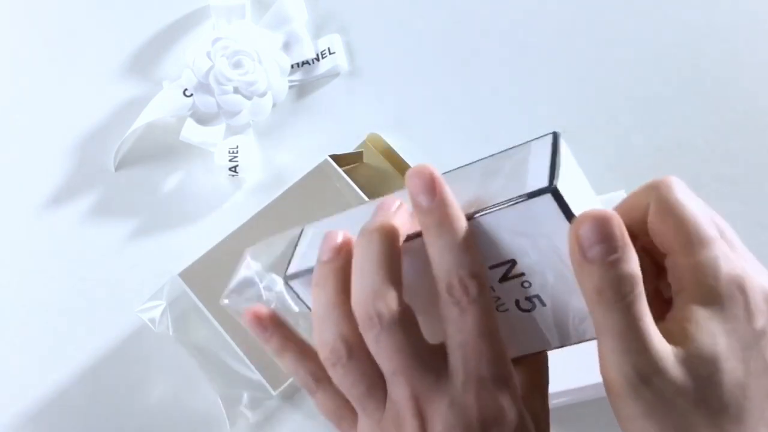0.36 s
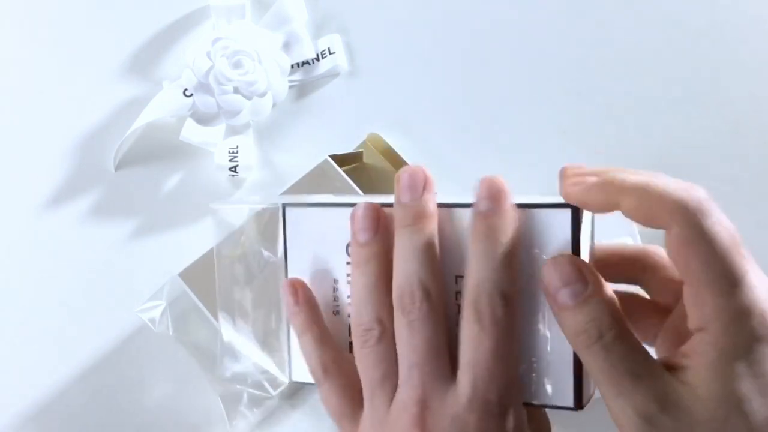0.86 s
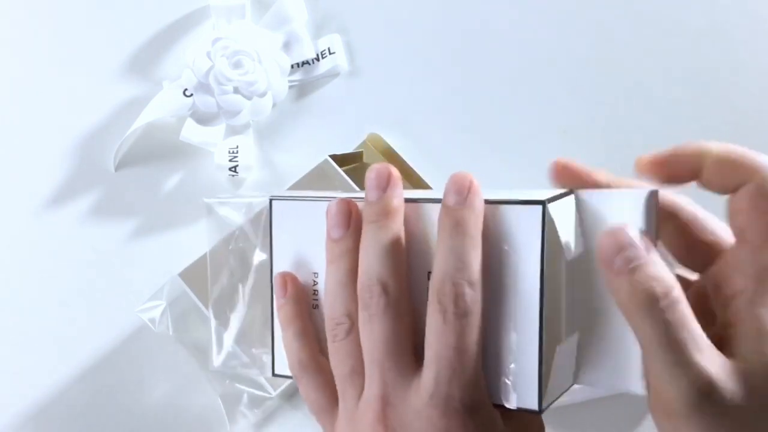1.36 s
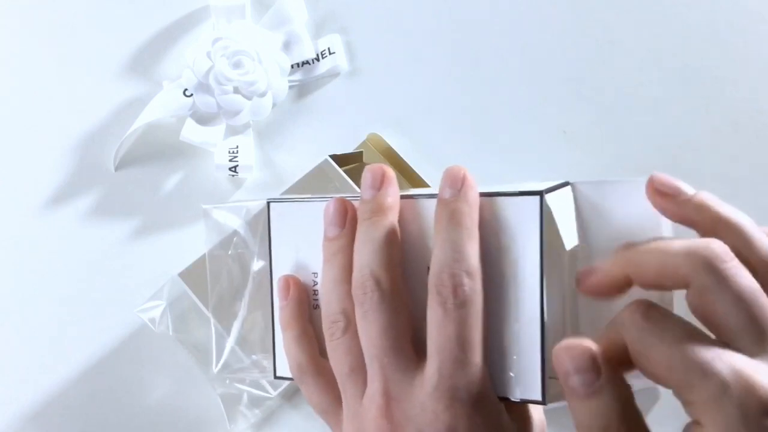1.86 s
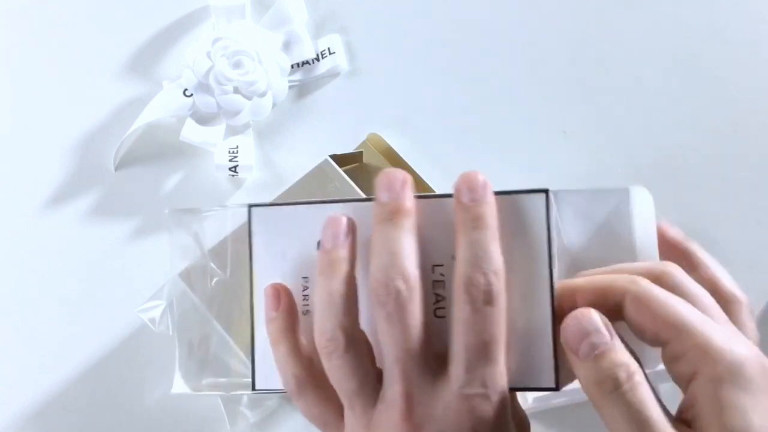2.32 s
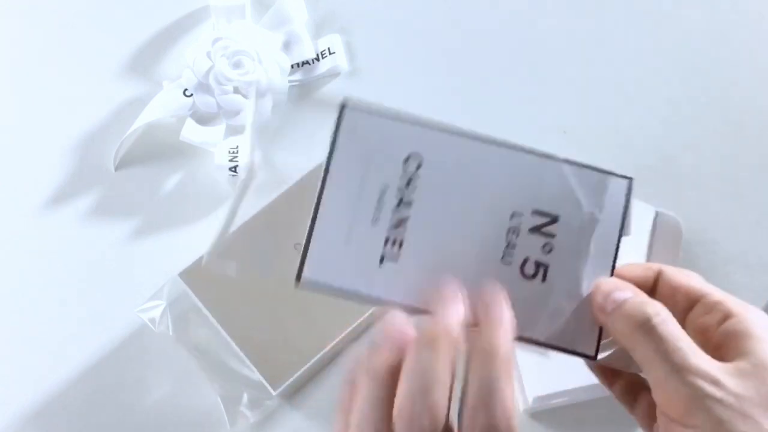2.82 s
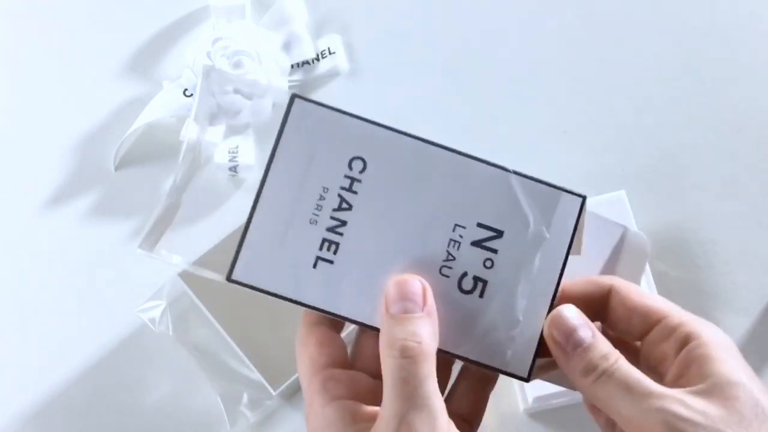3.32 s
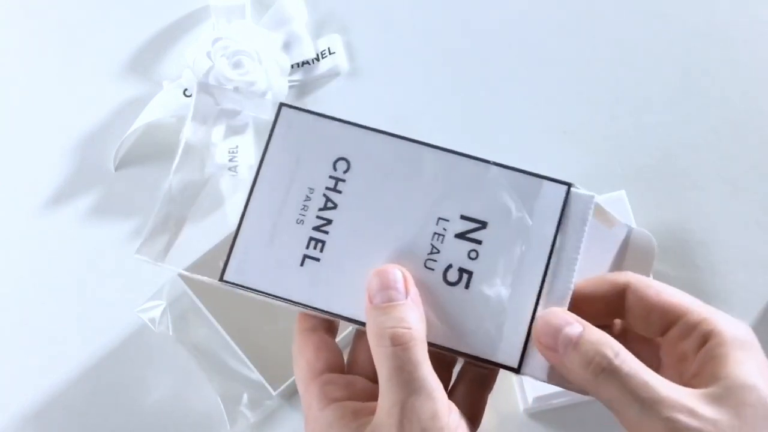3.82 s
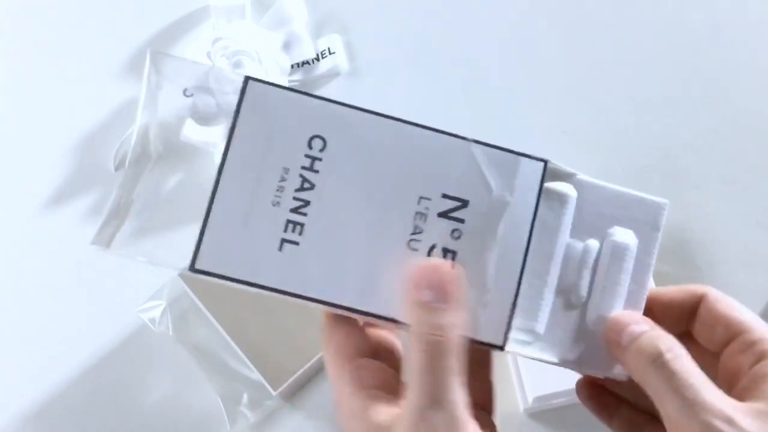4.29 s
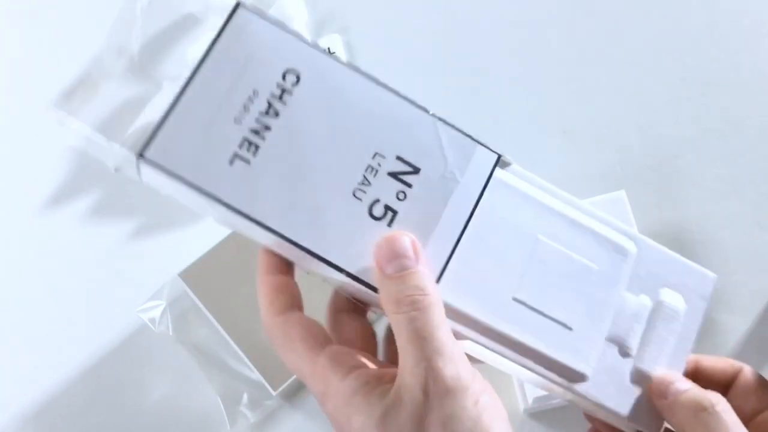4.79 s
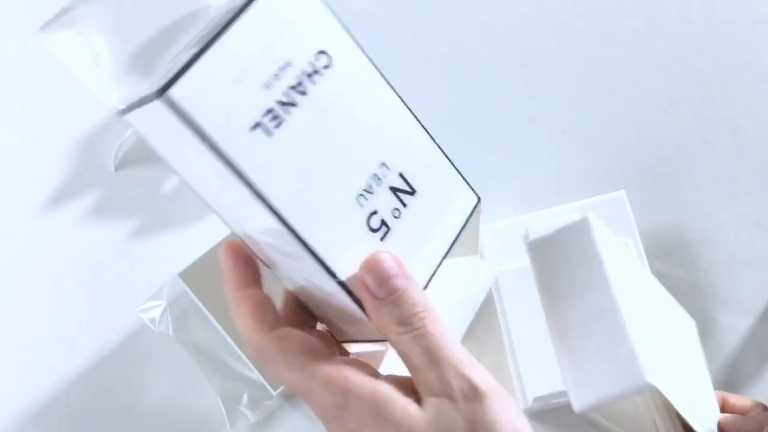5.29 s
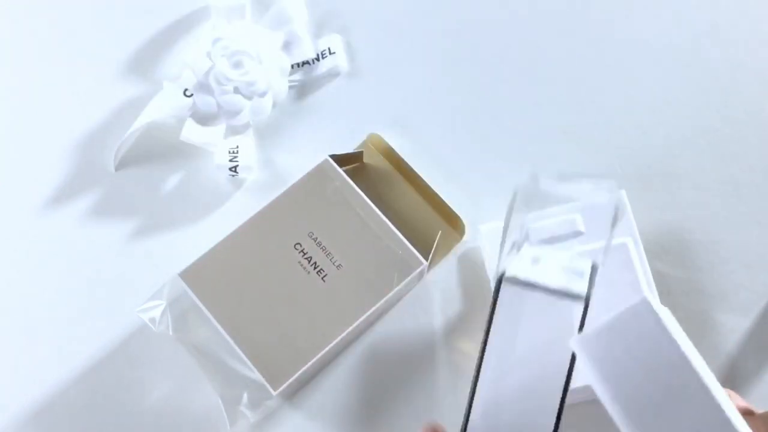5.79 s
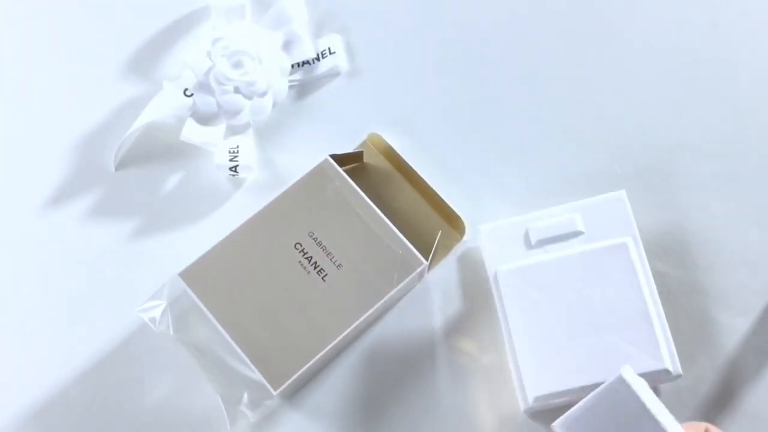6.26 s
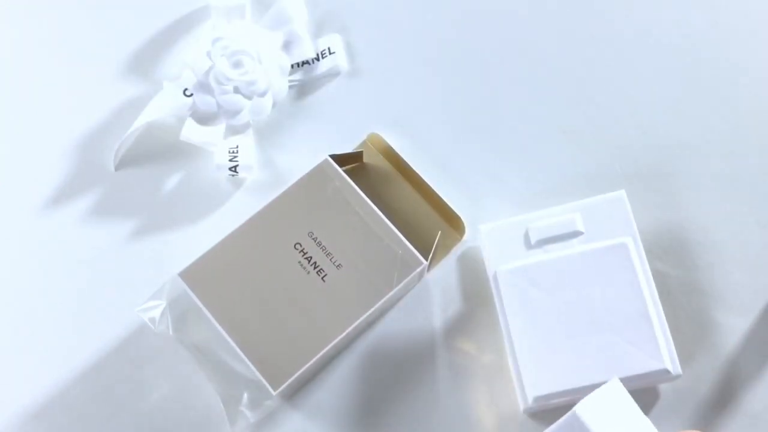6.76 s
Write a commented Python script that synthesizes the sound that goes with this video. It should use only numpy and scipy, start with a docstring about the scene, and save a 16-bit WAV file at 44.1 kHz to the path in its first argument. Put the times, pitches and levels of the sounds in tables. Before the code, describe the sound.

Dry plastic crackles, card rubs and hollow taps in a quiet room, a scraping tray that cracks loose, then a last crinkly flurry and stillness.

```python
"""At a table in a small quiet room, close to the microphone, hands open a small cardboard box in plastic film.
Skin hisses, rasps and drones over the card, made of uneven noise shaped by resonances. Film crackles and
knocks are short bursts that ring the card, the air in the box and the table. A moulded tray drags, snaps
free with decaying tones and slides out in a second pull; near the end come faint squeaks and scuffs.
"""
import sys
import numpy as np
from scipy import signal
from scipy.fft import rfft, irfft, next_fast_len
from scipy.io import wavfile
from scipy.ndimage import uniform_filter1d, map_coordinates

SR = 44100
rng = np.random.default_rng(int(sys.argv[2]) if len(sys.argv) > 2 else 0)


def unload_wav(signal):
    """Save mono or channel-first audio to the path in sys.argv[1] as 16-bit WAV at rate SR, clipped to [-1, 1]."""
    wavfile.write(
        sys.argv[1],
        SR,
        np.round(np.clip(np.atleast_2d(signal).T, -1, 1) * 32767).astype(np.int16),
    )


def volts_from_decibels(level):
    """Turn decibel levels (scalar or array-like) into linear amplitude factors."""
    exponent = np.asarray(level, float) / 20
    return 10 ** exponent


N = 314323  # length in samples


def unit(x):
    """Scale to rms 1."""
    return x / np.sqrt(np.mean(x ** 2) + 1e-20)


def colour(points):
    """Loudness against pitch, drawn through (pitch_hz, level_db) points on a log pitch axis."""
    pitch_hz, level_db = np.transpose(points)
    return lambda hz: volts_from_decibels(np.interp(np.log(hz + 1), np.log(pitch_hz + 1), level_db))


def resonances(modes, scale=1):
    """How a body rings at (pitch, width_hz, level_db) modes; scale multiplies the pitches only."""
    def response(hz):
        total = 0
        for k, (pitch, width_hz, level_db) in enumerate(modes):
            damping = 1j * hz * width_hz
            # neighbours alternate in sign
            total = total + (-1) ** k * volts_from_decibels(level_db) * damping / ((pitch * scale) ** 2 - hz * hz + damping)
        return total
    return response


def filtered(x, response):
    """Shape a sound by a response that depends on frequency."""
    size = next_fast_len(len(x) + 4096)  # spare room for the ringing
    return irfft(rfft(x, size) * response(np.fft.rfftfreq(size, 1 / SR)), size)[:len(x)]


def curves(rows):
    """One value per sample for each column after the time."""
    time_s, *columns = np.transpose(rows)
    return [np.interp(np.arange(N) / SR, time_s, column) for column in columns]


def wobble(rate):
    """A smooth random curve with rate knots a second."""
    knots = rng.standard_normal(int(N * rate / SR) + 4)
    return map_coordinates(knots, [np.arange(N) * rate / SR])


def blow(contact_s, room_db, room_t60, rough=1):
    """A short contact, rough or clean, then the room's diffuse answer building up and dying."""
    t = np.arange(SR // 5) / SR
    room = volts_from_decibels(room_db - 60 * t / room_t60) * (1 - np.exp(-t / 0.0016))
    noise = rng.standard_normal(len(t))
    contact = (rough * noise + 1 - rough) * np.exp(-t / contact_s)
    return contact + noise * room


def peak(x):
    """Scale to peak 1 and let the end fade to nothing."""
    return x / np.abs(x).max() * np.cos(np.linspace(0, np.pi / 2, len(x)))


def add(track, start_s, sound):
    """Mix a sound in at a time."""
    part = track[round(start_s * SR):][:len(sound)]
    part += sound[:len(part)]


def stroke(start_s, end_s, level_db):
    """One smooth swell and fade."""
    progress = np.clip((np.arange(N) / SR - start_s) / (end_s - start_s), 0, 1)
    return volts_from_decibels(level_db) * np.sin(np.pi * progress)


def scrape(response, grain_db, flutter_db, patchy_db=2.0, catch=0):
    """Friction: dense slips of uneven size in uneven clumps; the contact shifts, so colour comes in patches."""
    sizes = np.minimum(rng.exponential(size=N), 5)  # no slip is huge
    slips = unit(rng.standard_normal(N) * volts_from_decibels(grain_db * sizes))
    catches = rng.random(N) < 130 / SR  # about 130 a second: the card sticks and lets go
    slips = slips + catch * rng.uniform(-1.1, 1, N) * catches
    clumps = volts_from_decibels(flutter_db * (wobble(25) + wobble(90)))
    spectrum = signal.stft(slips * clumps, nperseg=256)[2]
    patches = uniform_filter1d(rng.standard_normal(spectrum.shape), size=3, axis=0)  # over pitch
    patches = uniform_filter1d(patches, size=12, axis=1)  # over time
    patchy = signal.istft(spectrum * volts_from_decibels(patchy_db * unit(patches)), nperseg=256)[1][:N]
    return unit(filtered(patchy, response))


# colour of the room tone, relative levels: pitch_hz [Hz], level_db [dB]
ROOM_COLOUR = [(15, -65), (25, -31), (190, -9), (335, -13.5), (427, -15.5), (591, -20), (5140, -31),
               (14800, -32.5), (16000, -48)]


def room_tone():
    """Low murmur of the house and the hiss of the microphone, as steady coloured noise."""
    return volts_from_decibels(-72) * unit(filtered(rng.standard_normal(N), colour(ROOM_COLOUR)))


# strokes of skin on card and film: start_s (full pressure) [s], hold_s [s], hiss_db [dB], drone_db [dB]
STROKES = [(0, 0, -55.5, -52.5), (0.068, 0.01, -59, -55.5), (0.15, 0.16, -68.5, -70),
           (0.395, 0.045, -85, -56), (0.421, 0.038, -63.5, -63), (0.585, 0, -81, -60),
           (0.803, 0.034, -69, -66.5), (0.98, 0.0051, -74, -63), (1.25, 0.019, -73, -50),
           (1.261, 0.024, -46, -68), (1.312, 0.0064, -56, -48.5), (1.395, 0.16, -79, -65),
           (1.706, 0, -57.5, -60), (1.747, 0.1, -75, -63.5), (1.919, 0.048, -69.5, -55.5),
           (2.122, 0, -68, -57.5), (2.213, 0.05, -89, -66.5), (2.391, 0.11, -71.5, -61),
           (2.564, 0.083, -73.5, -66), (2.751, 0.06, -72, -64.5), (3.396, 0.062, -66.5, -62),
           (3.476, 0.011, -83, -53.5), (3.544, 0, -68.5, -51.5), (3.773, 0.072, -70, -55.5),
           (3.803, 0.032, -60, -54.5), (4.384, 0.00073, -60, -47), (4.447, 0.063, -76, -63),
           (5.229, 0.016, -61.5, -51), (5.245, 0.033, -60.5, -48), (5.347, 0.042, -74, -62.5),
           (5.859, 0.04, -72.5, -61), (6.015, 0.12, -80, -71), (6.19, 0.031, -78, -58.5),
           (6.253, 0.016, -49.5, -58), (6.363, 0, -55.5, -53), (6.43, 0.044, -75, -73)]
# the tray drags out in two pulls, one list each: time_s [s], drag_db [dB], singing_db of the ribs [dB]
PULLS = [
    [(3.88, -66.5, -85), (3.96, -67, -84), (3.99, -52, -76), (4.04, -53, -65), (4.11, -51, -54.5),
     (4.19, -51, -58.5), (4.28, -59.5, -72), (4.4, -64, -82)],
    [(4.56, -86.5, -97), (4.6, -51.5, -63), (4.69, -45, -50), (4.715, -50.5, -64), (4.8, -43.5, -62),
     (4.87, -49, -63), (4.99, -47.5, -56.5), (5.05, -46, -50), (5.1, -53, -68), (5.2, -68.5, -82)],
]
# hiss of each pull at full drag: level_db [dB]
PULL_HISS_DB = [-53, -56.5]


def pressure():
    """Hiss and drone levels in dB: resting hands, all strokes and both pulls add their power."""
    press_db_per_s, lift_db_per_s = 713, 361  # a stroke sets in and lets go
    approach_db, approach_db_per_s = -15, 260  # before it the hand creeps into place
    settle_db, settle_db_per_s = -13.5, 104  # after it the card settles slowly
    resting_hiss_db, resting_drone_db = -89.5, -84  # hands that only hold the box
    full_drag_db, hiss_follows = -46, 0.42  # near full drag the hiss follows it only in part

    t = np.arange(0, N / SR, .002)
    start_s, hold_s, *levels_db = np.transpose(STROKES)[:, :, None]
    before_s = np.maximum(start_s - t, 0)
    after_s = np.maximum(t - start_s - hold_s, 0)
    rise_db = np.maximum(-press_db_per_s * before_s, approach_db - approach_db_per_s * before_s)
    fall_db = np.maximum(-lift_db_per_s * after_s, settle_db - settle_db_per_s * after_s)
    power = volts_from_decibels([[resting_hiss_db], [resting_drone_db]]) ** 2
    power = power + np.sum(volts_from_decibels(levels_db + (rise_db + fall_db)) ** 2, axis=1)
    for pull, full_hiss_db in zip(PULLS, PULL_HISS_DB):
        time_s, drag_db, _ = np.transpose(pull)
        drag_db = np.interp(t, time_s, drag_db, left=-np.inf, right=-np.inf)
        slack_db = drag_db - full_drag_db
        hiss_db = full_hiss_db + np.minimum(hiss_follows * slack_db, slack_db + 0.5)
        power = power + volts_from_decibels([hiss_db, drag_db]) ** 2
    return curves(np.transpose([t, *10 * np.log10(power)]))


# colour of the surface hiss, relative levels: pitch_hz [Hz], level_db [dB]
HISS_COLOUR = [(2700, -21.5), (3700, -12.5), (6000, -8.5), (13100, -20.5), (15500, -23.5), (16000, -44)]


def surface_hiss(hiss_db):
    """Skin hisses over the surface: friction noise that follows the strokes."""
    return volts_from_decibels(hiss_db) * scrape(colour(HISS_COLOUR), grain_db=3.0, flutter_db=1.85)


# how the stiff card rings, also when it snaps: pitch_hz [Hz], width_hz [Hz], level_db [dB]
CARD = [(1570, 410, -0.5), (2052, 150, 6), (2380, 700, -2), (3470, 830, -0.5), (4930, 2000, -10)]


def card_rasp(hiss_db, drone_db):
    """The card rasps at its own resonances, at a level between hiss and drone."""
    rasp_db = 0.53 * hiss_db + 0.48 * drone_db - 0.7
    return volts_from_decibels(rasp_db) * scrape(resonances(CARD), grain_db=3.0, flutter_db=2.7)


# the air in the box rings higher when tilted or emptied: time_s [s], pitch_hz [Hz]
CAVITY = [(.3, 1130), (.4, 863), (1.26, 938), (1.3, 1014), (1.36, 882), (2.1, 862), (2.84, 843),
          (3.0, 1010), (3.3, 910), (4.1, 912), (4.62, 1100), (4.73, 1180), (4.8, 947), (4.92, 1110),
          (5.1, 1000), (5.4, 890), (5.8, 1063), (6.23, 966), (6.275, 763), (6.37, 1000), (7.13, 1130)]
# how the hollow box rings, also when knocked: pitch [times the cavity pitch], width_hz [Hz], level_db [dB]
BOX = [(1.001, 102.7, 6), (1.25, 160.2, 0), (1.42, 250, -2.5)]
# the drone cross-fades between these: pitch_hz [Hz]
BOX_PITCHES_HZ = [899, 972, 1190]


def box_drone(drone_db):
    """Rubbing, with sudden catches, rings the air in the box; its pitch follows the cavity."""
    cavity_hz, = curves(CAVITY)
    drone = np.zeros(N)
    for pitch_hz, picked in zip(BOX_PITCHES_HZ, np.eye(len(BOX_PITCHES_HZ))):
        share = np.interp(cavity_hz, BOX_PITCHES_HZ, picked)
        inside = resonances(BOX, pitch_hz)
        mouth = resonances([(1.1, 800, 0)], pitch_hz)
        rubbed = scrape(lambda hz: inside(hz) * mouth(hz), grain_db=4.0, flutter_db=1.5, catch=volts_from_decibels(20.5))
        drone += np.sqrt(share) * rubbed
    return volts_from_decibels(drone_db) * drone


# how hard the hands work the box: time_s [s], level_db of the rumble [dB]
HANDLING = [(0, -61), (.6, -78.5), (1.2, -84), (1.35, -69.5), (2, -89), (2.5, -67), (3.1, -91), (3.35, -77),
            (3.42, -61.5), (3.75, -78.5), (4.15, -60), (4.5, -65.5), (5.3, -64), (5.5, -73), (6.15, -76),
            (6.2, -64), (6.45, -69), (6.6, -71.5), (7.13, -75.5)]
# how box panels and table top ring, also when knocked: pitch_hz [Hz], width_hz [Hz], level_db [dB]
PANELS = [(142, 79, -18), (175.2, 14, -3.5), (285, 76, -4), (402, 34, 4), (497, 65, -1), (715, 130, -2.5)]


def handling_rumble():
    """Handling makes the panels and the table top rumble."""
    rumble_db, = curves(HANDLING)
    return volts_from_decibels(rumble_db) * scrape(resonances(PANELS), grain_db=1.5, flutter_db=2.5)


# film and paper crackles: start_s [s], level_db (peak of the film click) [dB],
# card_db (rough rms of the card snap against that peak) [dB]
CRACKLES = [(0.0044, -30, -43), (0.0536, -31.5, -48), (0.1235, -37, -14), (0.1745, -43, -13),
            (0.186, -40, -27), (0.205, -45, -6), (0.2398, -40, -18), (0.2688, -52, -22),
            (0.3935, -31.5, -15), (0.402, -32.5, -17), (0.432, -36, -14.5), (0.4387, -34.5, -44),
            (0.7889, -33.5, -13), (0.881, -60.5, -2), (0.9563, -43, -3.5), (1.1177, -55, -8.5),
            (1.2066, -44, -16), (1.2554, -36, -15), (1.243, -48, 3), (1.262, -36, -17), (1.272, -31.5, -17),
            (1.288, -27.5, -9.5), (1.3066, -40, 1), (1.3654, -32, -7), (1.4982, -41.5, -17),
            (1.511, -40, -8.5), (1.7073, -44.5, -5), (1.9068, -48, -16), (1.957, -50, 0), (2.1185, -47, -3),
            (2.439, -44.5, 6.5), (2.545, -61.5, 1), (2.623, -41, -10), (2.7284, -51.5, -16),
            (2.831, -54.5, -6), (3.04, -52.5, 0), (3.546, -56, -6), (3.6536, -50.5, 1.5),
            (4.1277, -40.5, 3), (4.3436, -42, -24), (4.4221, -38, -16), (4.481, -45.5, -8),
            (5.119, -40.5, -3.5), (5.2973, -46, 0.5), (5.836, -56.5, 7.5), (6.1481, -29.5, -14),
            (6.1804, -40.5, -14), (6.188, -47.5, 2.5), (6.21, -38.5, -3.5), (6.2278, -37, -4),
            (6.2458, -30.5, -8.5), (6.277, -27.5, -10), (6.352, -43, -4), (6.367, -46, 1.5),
            (6.488, -58, 0.5), (6.6277, -52, -5), (6.6603, -41.5, -16.5), (6.7458, -53.5, -14),
            (6.769, -48, -11.5), (6.847, -61.5, 2)]
# colour of the film click: pitch_hz [Hz], level_db [dB]
FILM_COLOUR = [(1900, -35), (4000, -6), (6520, -6), (8330, -5.5), (14500, -6), (15300, -12.5), (16000, -35)]


def crackles():
    """The film clicks and the card under it snaps along; the more card, the duller the film."""
    out = np.zeros(N)
    for start_s, level_db, card_db in CRACKLES:
        # each crease has its own colour
        crease = resonances([(6400 * np.exp(rng.normal(0, 0.18)), 700, 5)])
        dull = 0.048 * (card_db + 14.0)

        def tone(hz):
            tilt = (6000 / np.maximum(hz, 3000)) ** dull
            return colour(FILM_COLOUR)(hz) * tilt * (1 + crease(hz))

        film = peak(filtered(blow(0.00082, -13.5, 0.11), tone))
        # a snap rings more narrowly than a rub
        modes = [(hz, .6 * width_hz, mode_db + rng.normal(0, 3)) for hz, width_hz, mode_db in CARD]
        stiff_card = resonances(modes, np.exp(rng.normal(0, 0.066)))
        card = peak(filtered(blow(0.0011, -11.5, 0.091), stiff_card))
        add(out, start_s, volts_from_decibels(level_db) * (film + volts_from_decibels(card_db + 5.5) * card))  # 5.5 dB from rms to peak
    return out


# knocks of fingers and tray on the box: start_s [s], level_db (peak of the box sound) [dB],
# thud_db (rough rms of the table thud against that peak) [dB]
KNOCKS = [(0.058, -38.5, -20.5), (0.077, -41, -25), (0.122, -42, -26), (0.206, -41, -24.5),
          (0.223, -36, -35), (0.175, -46, -30), (0.181, -43, -37), (0.241, -47, -23), (0.269, -47, -20),
          (0.392, -44, -19), (0.403, -40.5, -14.5), (0.787, -40.5, -12.5), (0.807, -42.5, -13.5),
          (0.881, -50.5, -20), (0.956, -44, -22.5), (1.117, -50.5, -13), (1.3067, -29.5, -20.5),
          (1.3099, -28, -32), (1.317, -41, -42), (1.365, -25, -24), (1.51, -49, -11), (1.699, -39.5, -29),
          (1.709, -35, -23), (1.814, -50, -18), (1.956, -47.5, -20), (2.079, -49.5, -29), (2.119, -44, -23),
          (2.442, -40.5, -3.5), (2.4466, -34, -35), (2.578, -55, -20.5), (2.702, -53.5, -27),
          (2.73, -46.5, -20), (2.832, -42, -27), (2.998, -50, -20), (3.02, -53.5, -11), (3.403, -59, 2),
          (3.419, -61, 3), (3.463, -36.5, -25), (3.471, -41.5, -22), (3.496, -39, -36), (3.528, -47, -14.5),
          (3.605, -44, -38), (3.653, -34.5, -17), (4.127, -31, -23.5), (4.182, -55, 3.5),
          (4.385, -41.5, -15.5), (4.581, -44, -26), (4.607, -39, -22), (4.631, -31.5, -23.5),
          (4.796, -39, -33), (4.813, -35.5, -25), (5.1235, -29, -31), (5.374, -39.5, -26.5),
          (5.836, -42, -20.5), (5.841, -36.5, -27), (6.191, -54.5, 3), (6.226, -39, -27),
          (6.274, -37, -22.5), (6.371, -40, -13), (6.454, -58, -20), (7, -48.5, -13.5)]


def knocks():
    """Each knock rings the air in the box and thuds through the panels into the table."""
    out = np.zeros(N)
    for start_s, level_db, thud_db in KNOCKS:
        cavity_hz = np.interp(start_s, *np.transpose(CAVITY))
        damping = 2.04 if start_s < .35 else 1  # gripped in the air at first, the box rings shorter
        modes = [(pitch, damping * width_hz, mode_db + rng.normal(0, 4.4)) for pitch, width_hz, mode_db in BOX]
        inside = resonances(modes, cavity_hz)
        mouth = resonances([(1.05, damping * 420, 0)], cavity_hz)  # the open end lets out little else
        tap = blow(0.0002616, -20.5, 0.09, rough=0.22)
        box = peak(filtered(tap, lambda hz: inside(hz) * (mouth(hz) + .15)))
        panels = resonances(PANELS, np.exp(rng.normal(0, 0.024)))
        thud = peak(filtered(blow(0.0013, -6, 0.19, rough=0.18), panels))
        add(out, start_s, volts_from_decibels(level_db) * (box + volts_from_decibels(thud_db + 10.0) * thud))  # 10 dB from rms to peak
    return out


# how the tray's ribs ring, before the pitch factor: pitch_hz [Hz], width_hz [Hz], level_db [dB]
RIBS = [(2060, 300, -3.5), (3640, 300, -2), (4684, 230, -2.5)]
# pitch factor of each pull, lower while most of the tray is still inside: pitch [times the rib pitch]
RIB_PITCH = [0.81, 0.97]


def singing_ribs():
    """The tray's ribs sing at their resonances as they slide in the two pulls."""
    out = np.zeros(N)
    for pull, pitch in zip(PULLS, RIB_PITCH):
        time_s, _, singing_db = np.transpose(pull)
        level_db = np.interp(np.arange(N) / SR, time_s, singing_db, left=-np.inf, right=-np.inf)
        out += volts_from_decibels(level_db) * scrape(resonances(RIBS, pitch), grain_db=3.0, flutter_db=-1.0, patchy_db=3.0)
    return out


# the snap and its rebound: start_s [s], level_db [dB]
SNAP = [(4.2004, -7), (4.208, -20)]
# the tray as it snaps over a fold: pitch_hz [Hz], level_db [dB], t60_s (time to fall 60 dB) [s]
TRAY = [(308, -23, 0.044), (623, -22, 0.029), (1000, -7.5, 0.03), (1180, -17, 0.076), (1597, -17, 0.035),
        (2160, -1, 0.014), (2469, -12, 0.02), (3170, 0.5, 0.015), (3280, 6, 0.0087), (3654, -12, 0.02),
        (5850, -14.5, 0.0226), (6950, -11, 0.0073)]
# the hollow of the tray, relative levels: pitch_hz [Hz], width_hz [Hz], level_db [dB]
HOLLOW = [(1100, 89, -9.5), (3080, 500, -5.5), (3125, 90, 1.5), (3150, 24, 1.5)]


def tray_snap():
    """The tray cracks and rings at its modes; the room answers and the tray's hollow hums on."""
    out, t = np.zeros(N), np.arange(SR // 3) / SR

    def dying(t60_s):
        return rng.standard_normal(len(t)) * volts_from_decibels(-60 * t / t60_s) * (1 - np.exp(-t / 0.0036))

    for start_s, level_db in SNAP:
        ring = np.zeros(len(t))
        for pitch_hz, mode_db, t60_s in TRAY:
            fading = volts_from_decibels(mode_db + rng.normal(0, 1) - 60 * t / t60_s)
            ring += fading * np.sin(2 * np.pi * pitch_hz * t)
        noise = filtered(rng.standard_normal(len(t)), lambda hz: (hz > 400) * (hz < 14800))
        crack = volts_from_decibels(-15.5) * noise * np.exp(-t / 0.0043)
        add(out, start_s, volts_from_decibels(level_db) * (ring + crack) * (1 - np.exp(-t / 0.00096)))
    echo = signal.fftconvolve(out, volts_from_decibels(-47.5) * dying(0.27))[:N]
    add(out, SNAP[0][0], volts_from_decibels(-8.5) * filtered(dying(0.24), resonances(HOLLOW)))
    return filtered(out + echo, lambda hz: (1j * hz / (180 + 1j * hz)) ** 2)  # too small to send out bass


# faint squeaks, probably the folded flaps: start_s [s], end_s [s],
# level_db (peak before flicker) [dB], pitch_hz (at the start) [Hz]
SQUEAKS = [(6.015, 6.12, -65, 1230), (6.04, 6.14, -69, 1710)]


def squeaks():
    """Faint tones that sag in pitch, waver and flicker in level."""
    sag_per_s, waver, flicker_db = .4, .012, 4  # sag and waver are fractions of the pitch
    out = np.zeros(N)
    for start_s, end_s, level_db, pitch_hz in SQUEAKS:
        bend = 1 - sag_per_s * (np.arange(N) / SR - start_s) + waver * wobble(79)
        turns = np.cumsum(pitch_hz * bend) / SR
        out += stroke(start_s, end_s, level_db + flicker_db * wobble(90)) * np.sin(2 * np.pi * turns)
    return out


# how the table rings under the box, relative levels: pitch_hz [Hz], width_hz [Hz], level_db [dB]
TABLE = [(258.5, 24, 3.5), (2880, 280, -13.5)]
# strokes of the box over the table: start_s [s], end_s [s], level_db [dB]
SCUFFS = [(6.182, 6.266, -51), (6.34, 6.535, -59.5)]


def table_scuffs():
    """The empty box scuffs over the table as it is set down: swells of noise through table resonances."""
    swells = sum(stroke(*scuff) for scuff in SCUFFS)
    return swells * unit(filtered(rng.standard_normal(N), resonances(TABLE)))


def scene():
    """All sources, mono; the same strokes drive hiss, rasp and drone."""
    hiss_db, drone_db = pressure()
    rubbing = surface_hiss(hiss_db) + card_rasp(hiss_db, drone_db) + box_drone(drone_db)
    box_and_film = handling_rumble() + crackles() + knocks()
    tray = singing_ribs() + tray_snap()
    return (room_tone() + rubbing + box_and_film + tray + squeaks() + table_scuffs())[None]


def top_cut(x):
    """Nothing passes above the cut-off."""
    return signal.sosfilt(signal.butter(12, 16470, fs=SR, output="sos"), x)


def record(dry):
    """The microphone drops the deep bass and the last treble."""
    def band(hz):
        bass_cut = (1j * hz / 60 / (1 + 1j * hz / 60)) ** 2
        return bass_cut / (1 + (hz / 15400) ** 60)

    mix = filtered(dry[0], band)[None]
    return top_cut(mix)


dry = scene()
out = record(dry)
unload_wav(out)
```